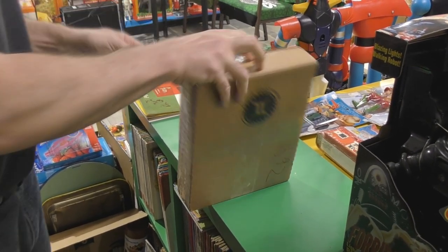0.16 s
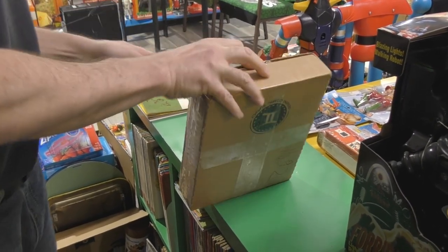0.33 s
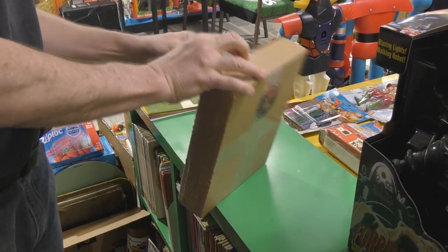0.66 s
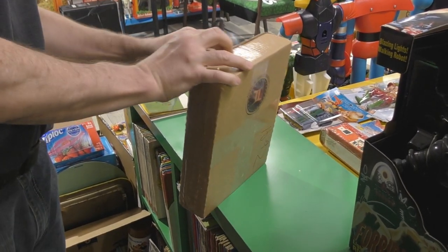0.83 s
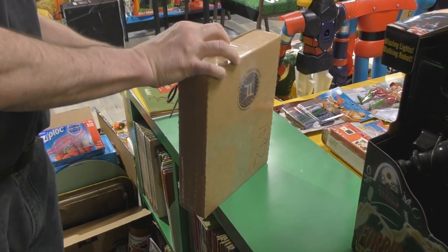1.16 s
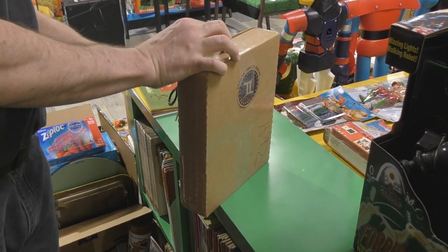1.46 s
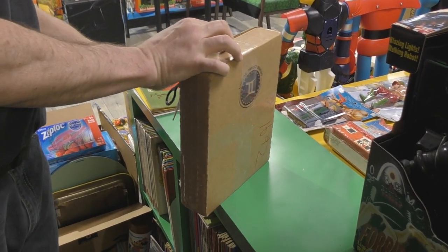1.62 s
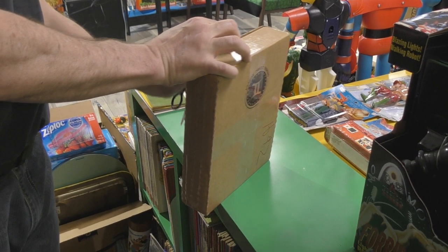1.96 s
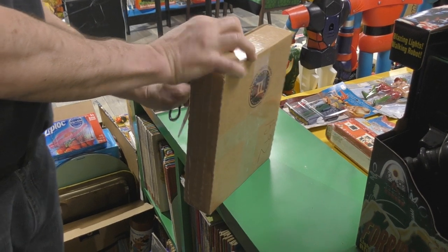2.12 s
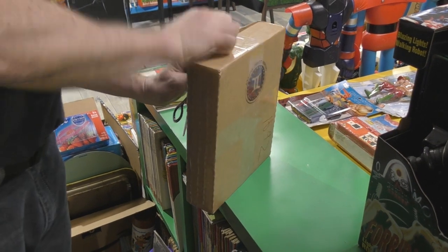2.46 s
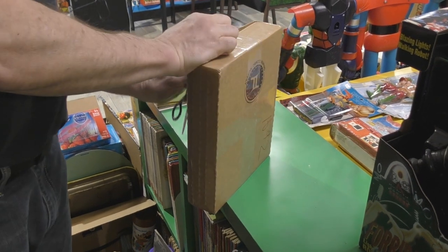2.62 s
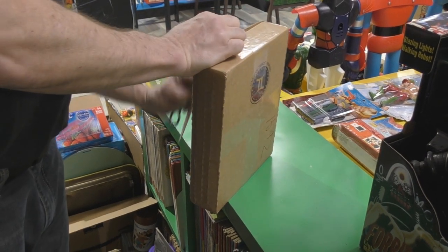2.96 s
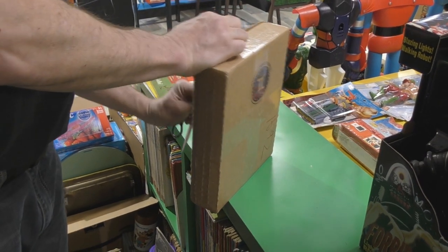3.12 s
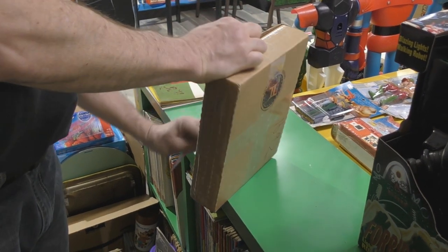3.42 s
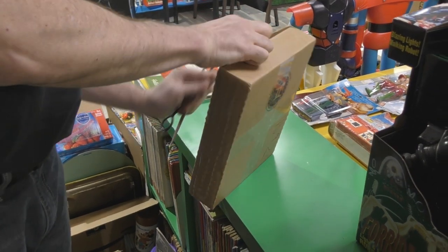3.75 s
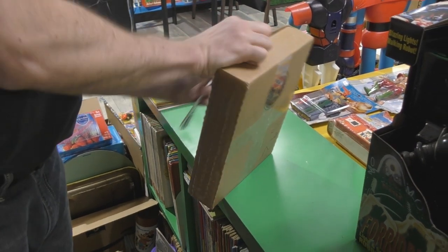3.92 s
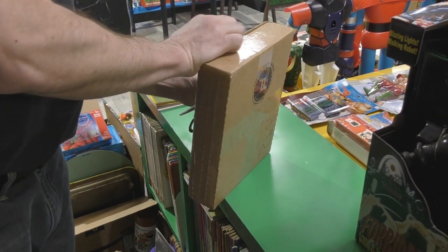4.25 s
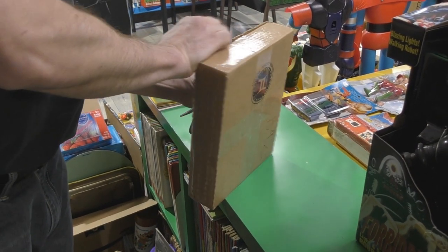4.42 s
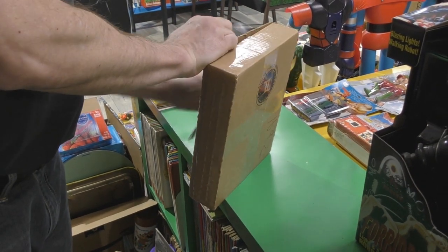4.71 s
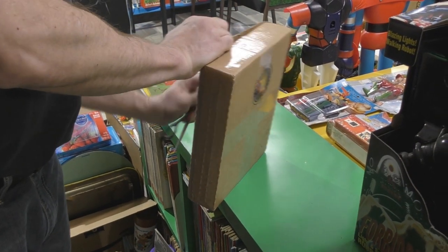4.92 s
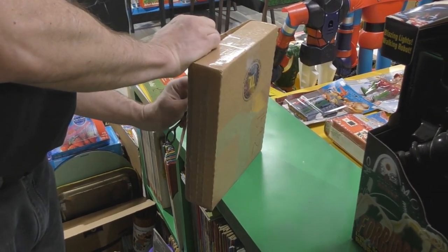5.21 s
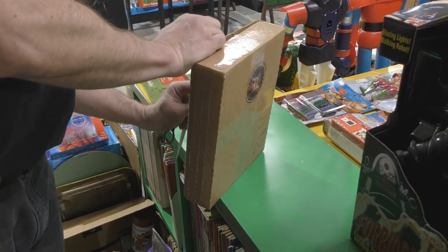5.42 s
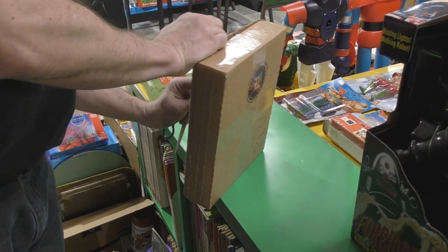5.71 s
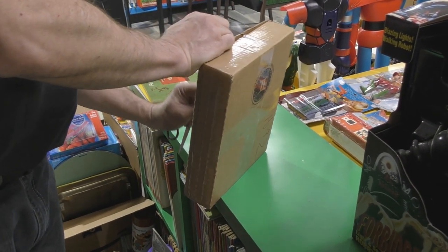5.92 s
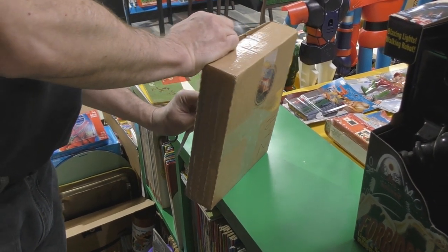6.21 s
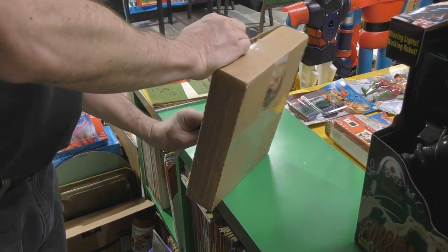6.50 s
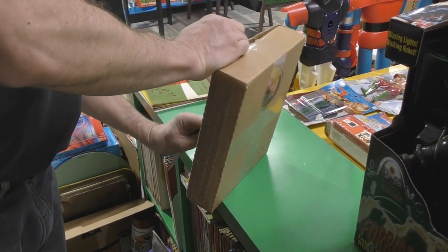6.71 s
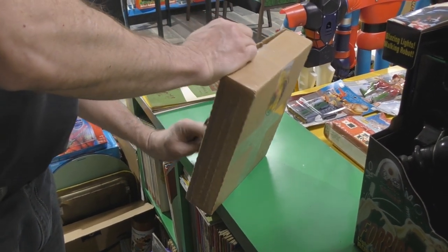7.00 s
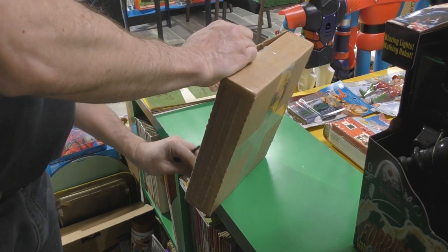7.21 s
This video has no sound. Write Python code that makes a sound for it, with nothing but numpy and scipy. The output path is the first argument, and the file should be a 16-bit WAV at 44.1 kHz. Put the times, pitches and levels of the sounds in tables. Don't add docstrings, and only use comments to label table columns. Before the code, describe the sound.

In a quiet furnished room, fingers slide, pick and tap on a taped hollow carton near a camera microphone. Quiet rubbing leads to crisp clicks, then drumlike cardboard knocks, a short nail zip over corrugations and a faint tool clink. Strong snaps and scrapes come soon after, then scattered taps, a firm knock, and a last scuffing burst with a low table bump. Soft air noise and a barely audible whine continue underneath.

```python
import sys
import numpy as np
from scipy import signal
from scipy.fft import rfft, irfft, next_fast_len
from scipy.io import wavfile
from scipy.ndimage import uniform_filter1d, map_coordinates

SR = 44100
rng = np.random.default_rng(int(sys.argv[2]) if len(sys.argv) > 2 else 0)


def invert_db(level):
    return 10 ** (np.asarray(level, dtype=float) / 20)


def unload_wav(signal):
    wavfile.write(
        sys.argv[1],
        SR,
        np.round(np.clip(np.atleast_2d(signal).T, -1, 1) * 32767).astype(np.int16),
    )


N = 324796


def unit(x):
    return x / np.sqrt(np.mean(x ** 2) + 1e-20)


def along(points, hz):
    point_hz, value = np.transpose(points)
    return np.interp(np.log(hz + 1), np.log(point_hz + 1), value)


def curves(rows):
    s, *columns = np.transpose(rows)
    return [np.interp(np.arange(N) / SR, s, column) for column in columns]


def wobble(rate):
    knots = rng.standard_normal(int(N * rate / SR) + 4)
    return map_coordinates(knots, [np.arange(N) * rate / SR])


def filtered(x, response):
    m = next_fast_len(N + SR // 2)
    return irfft(rfft(x, m) * response(np.fft.rfftfreq(m, 1 / SR)), m)[..., :N]


def body(modes):
    def response(f):
        total = 0
        for k, (hz, width, db) in enumerate(modes):
            total = total + (-1) ** k * invert_db(db) * 1j * f * width / (hz * hz - f * f + 1j * f * width)
        return total
    return response


# frequency in Hz, density in dB per Hz.
AIR_SPECTRUM = [(20, -4), (50, 0.5), (85, -3.5), (140, 2.5), (333, -4), (449, -6), (542, -18.5),
                (800, -40.5)]
# frequency in Hz, density in dB per Hz.
HISS_SPECTRUM = [(450, -41.5), (600, -19.5), (929, -8), (1980, -7), (2730, -11.5), (6490, -26),
                 (12700, -17), (15800, -18.5)]
# frequency in Hz, left-right likeness from 0 to 1.
LIKENESS = [(60, 0.57), (180, 0.032), (550, 0.284), (1650, 0.074), (4970, 0.067), (15000, 0.556)]
FLOOR_DB = -59.5
WHINE_HZ, WHINE_DB = 2008, -74


def floor():
    def spectrum(f):
        level = np.hypot(invert_db(along(AIR_SPECTRUM, f)), invert_db(along(HISS_SPECTRUM, f)))
        turn = np.arccos(np.clip(along(LIKENESS, f), -1, 1)) / 2
        return level * [np.cos(turn), np.sin(turn)]

    pair = rng.standard_normal((2, N)) * invert_db(0.69 * wobble(4.8))
    mid, side = filtered(pair, spectrum)
    whine = invert_db(WHINE_DB + 0.96 * wobble(5.46)) * np.sin(2 * np.pi * WHINE_HZ * np.arange(N) / SR)
    return invert_db(FLOOR_DB) * unit(np.array([mid + side, mid - side])) + whine


CONTROL_S = np.arange(0, N / SR, 1 / 2000)


def gesture(start, length, rise, fall):
    before = (start - CONTROL_S) / abs(rise)
    after = (CONTROL_S - start - length) / abs(fall)
    return invert_db(-20 * np.maximum(0, np.maximum(before, after))) ** 2


# fastest moment in seconds, scrape in dB,
# hiss in dB over the scrape, seconds to rise 20 dB, seconds to fall 20 dB (signs ignored).
SLIDES = [(0.29, -56, 3, 0.1226, 0.21), (0.366, -59, 6.5, 0.1133, 0.02), (0.6, -61, 2, 0.06, 0.47),
          (0.72, -60.5, 2.5, 0.34, 0.09), (0.79, -64.5, -17, 1.37, 0.68),
          (1.384, -58.5, -0.5, 0.2444, 0.1737), (1.764, -64.5, -8.5, 0.43, 0.52),
          (2.47, -53, -2.05, 0.3037, 0.1758), (3.04, -55, -15.5, 0.35, 1.22),
          (3.094, -51, -3.5, 0.2282, 0.09), (3.35, -51.5, -3.5, 0.1562, 0.0843),
          (3.438, -46, -9, -0.0282, 0.0137), (3.658, -54.5, -7.5, -0.03, 0.1545),
          (3.925, -58.5, 1.5, 0.13, -0.3715), (4.138, -59, -22, 0.9, 0.44),
          (4.262, -40.5, 1.5, 0.0236, -0.0106), (4.22, -62.5, 5, 0.1046, -0.35),
          (4.529, -57, 3, -0.02, 0.2024), (5.994, -55.5, -12.5, 0.2535, 0.26),
          (6.83, -57, -11, 0.1263, 0.004), (7.16, -51, -9.5, 0.15, 0.17), (7.2, -46.5, -4.5, 0.057, 0.0972),
          (7.246, -44, -26, 0.033, 0.0439)]
# start in seconds, scrape in dB,
# hiss in dB over the scrape, seconds to fall 20 dB.
JERKS = [(0.136, -60, -4.5, 0.37), (0.764, -52, -14, 0.13), (0.919, -58, 1.24, 0.05),
         (1.114, -67, 8.5, 0.1655), (1.306, -59, -4, 0.2643), (1.954, -65, 6.5, 0.28),
         (2.564, -45, -8, 0.06), (4.236, -40, 0.5, 0.0676), (4.738, -58.5, -1, 0.35),
         (5.094, -56.5, -17, 0.16), (5.482, -55.5, 1, 0.02), (5.727, -51.5, -14, 0.05),
         (6.008, -40, -6, 0.0733), (6.186, -45, -5, 0.09)]
JERK_RISE_S = 0.0074
# start in seconds, length in seconds, scrape in dB,
# hiss in dB over the scrape.
DRAGS = [(0.198, 0.106, -58.5, -16), (0.939, 0.2754, -63, -5.5), (2.069, 0.217, -56.5, -5),
         (2.37, 0.0804, -55.5, 0.86), (2.649, 0.286, -65.5, -6.5), (3.364, 0.0774, -38.5, -3),
         (4.904, 0.035, -68, -8.5), (4.238, 0.0447, -45, 2.5), (3.97, 0.176, -60.5, -13),
         (4.437, 0.066, -50.5, -17.5), (4.602, 0.13, -65, -9), (5.144, 0.657, -70.5, -2),
         (5.932, 0.066, -62.5, -23), (6.089, 0.09, -59.5, -7.5), (6.407, 0.1306, -52.5, -10),
         (6.603, 0.279, -63, -11), (6.878, 0.24, -76.5, -11.5), (7.298, 0.0583, -67.5, -6.5)]
DRAG_RISE_S, DRAG_FALL_S = 0.0181, 0.1116
# firmest moment in seconds, rumble in dB,
# seconds to rise 20 dB, seconds to fall 20 dB (signs ignored).
GRIPS = [(0.2, -67, 3.17, 0.51), (0.64, -65, -0.04, 0.4414), (0.79, -59.5, 0.0946, 0.13),
         (0.918, -64.5, 0.15, 0.48), (1.764, -71, 1.6, 1), (2.09, -62, 0.07, 1.5),
         (2.45, -64.5, 0.55, 0.98), (3.04, -47.5, 0.2276, 0.077), (3.27, -58, -0.56, 0.53),
         (3.369, -46.5, -0.16, 0.17), (3.44, -52.5, -0.37, 0.14), (4.15, -57.5, 0.44, .5),
         (4.263, -50, 0.2, -0.12), (4.506, -60, -1.13, 0.15), (4.738, -66.5, -1.2, 0.48),
         (5.1, -59.5, -0.16, 0.32), (5.482, -59, -0.02, 0.05), (5.735, -60, 0.2, -0.05),
         (5.95, -61.5, -0.27, .5), (6.198, -48.5, 0.0555, 0.0933), (6.42, -51, -0.0968, 0.2448),
         (6.55, -64, -0.08, -0.32), (6.82, -64, -1.75, 0.17), (7.206, -47, 0.0631, 0.1139),
         (7.3, -60, 0.21, -1)]


def hands():
    moves = [(gesture(s, 0, rise, fall), db, hiss_db) for s, db, hiss_db, rise, fall in SLIDES]
    moves += [(gesture(s, 0, JERK_RISE_S, fall), db, hiss_db) for s, db, hiss_db, fall in JERKS]
    moves += [(gesture(s, length, DRAG_RISE_S, DRAG_FALL_S), db, hiss_db)
              for s, length, db, hiss_db in DRAGS]
    hiss = sum(invert_db(db + hiss_db) ** 2 * power for power, db, hiss_db in moves)
    scrape = sum(invert_db(db) ** 2 * power for power, db, hiss_db in moves)
    grip = sum(invert_db(db) ** 2 * gesture(s, 0, rise, fall) for s, db, rise, fall in GRIPS)
    return [np.interp(np.arange(N) / SR, CONTROL_S, np.sqrt(power)) for power in (hiss, scrape, grip)]


def gritty(grain_db, clump_db, patchy_db):
    z = signal.stft(rng.standard_normal(N), nperseg=512)[2]
    patches = uniform_filter1d(uniform_filter1d(rng.standard_normal(z.shape), 5, 0), 8, 1)
    noise = signal.istft(z * invert_db(patchy_db * unit(patches)), nperseg=512)[1][:N]
    return noise * invert_db(grain_db * wobble(700) + clump_db * wobble(45))


# frequency in Hz, density in dB per Hz.
SKIN_SPECTRUM = [(1470, -26.5), (2500, -9), (3730, -0.5), (4600, -3), (5280, -5.5), (6300, -3),
                 (7830, -2.5), (11700, -3.5), (15800, -9)]
# frequency in Hz, width in Hz, level in dB.
CARD_MODES = [(574, 300, -14.5), (1082, 324.3, -0.5), (1500, 691, -1), (2234, 636, -1.5),
              (3206, 1030, -9.5)]
# frequency in Hz, width in Hz, level in dB.
PANEL_MODES = [(181, 30.9, -1), (350, 97.08, -13.5), (472.7, 70.6, -18)]


def rubbing():
    skin, nail, grip = hands()
    hiss = gritty(grain_db=2.5, clump_db=0.7, patchy_db=1.5)
    hiss = unit(filtered(hiss, lambda f: invert_db(along(SKIN_SPECTRUM, f))))
    scrape = gritty(grain_db=2.5, clump_db=1, patchy_db=1.6)
    scrape = unit(filtered(scrape, body(CARD_MODES)))
    rumble = gritty(grain_db=1.51, clump_db=3.0, patchy_db=1.0)
    rumble = unit(filtered(rumble, lambda f: body(PANEL_MODES)(f) * f / (f + 90)))
    return invert_db(-1.5) * skin * hiss + invert_db(-1.42) * nail * scrape + invert_db(2.5) * grip * rumble


# start in seconds, peak in dB, card in dB over the peak,
# tape edge in dB over the peak.
SNAPS = [(0.9183, -49.5, -5.5, 12.5), (0.9567, -43.5, -2.5, -12), (1.1154, -42.5, -7, 2),
         (1.3055, -49.5, -1, -15), (1.9545, -35, -19, -5.5), (1.961, -36.5, -10, -5),
         (1.989, -37.5, -6.5, -21), (2.6677, -51.5, -9.5, -15.5), (3.3117, -44, -7.5, -14.5),
         (3.327, -50, -3.5, -8), (0.1343, -51, -13.5, -25), (3.3659, -26, -16, -18.5),
         (3.4555, -30, -4, -19), (3.948, -27, -12.5, -9), (3.954, -46, -19, -13.5),
         (4.2373, -33.5, -13.5, -12.5), (4.2547, -25, -10.5, -22.5), (4.262, -26, -11.5, -4),
         (4.293, -47, -9.5, -25.5), (4.4331, -34, -11, -27.5), (4.457, -38, -23.5, -18),
         (4.532, -36, -15, -11), (4.7396, -44, -4.5, 7), (6.0119, -32.5, -7, -15),
         (6.1352, -48, -10.5, -11), (7.196, -37, -16.5, 2.5), (7.2445, -36.5, -3, -26.5)]
SNAP_HZ, SNAP_SPREAD, SNAP_T60 = 2250, 0.133, 0.0504
# start in seconds, card peak in dB, card note in Hz.
TAPS = [(0.1343, -46, 1712), (0.517, -45.5, 1203), (0.7685, -40.5, 1583), (0.7844, -53.5, 1083),
        (1.0307, -43.5, 1239), (2.2194, -46, 1184), (2.364, -48, 1516), (2.5638, -33.5, 1235),
        (2.5761, -37, 1460), (3.0326, -43, 1120), (3.6304, -45.5, 1263), (2.081, -60, 1800),
        (3.175, -56.5, 1500), (5.68, -53, 993.6), (6.635, -60, 1197), (6.814, -52.5, 1500),
        (6.831, -49.5, 2130), (7.133, -51.5, 1900), (7.157, -45.5, 2288), (7.2078, -35, 1406),
        (3.6924, -52.5, 1224), (4.479, -39, 983), (5.0971, -52.5, 1100), (5.479, -45, 1515),
        (5.7299, -42.5, 1648), (5.9276, -47, 1636), (6.1872, -30.5, 1500), (6.412, -51.5, 1380),
        (6.475, -56, 2220), (1.215, -55, 1284), (1.78, -59.5, 1500), (6.7, -50, 1500),
        (6.7562, -46.5, 1538), (7.185, -41.5, 1369), (7.244, -31, 1500)]
TAP_TAPE_DB, TAP_EDGE_DB, TAP_T60 = -10, -19.5, 0.0341
TAPE_LOW_HZ = 1800


def picks():
    force, notes = np.zeros((3, N + SR)), np.zeros(N + SR)
    t = np.arange(SR // 8) / SR
    spots = SNAP_HZ * np.exp(SNAP_SPREAD * rng.uniform(-0.98, 1, len(SNAPS)))
    clicks = [(*row, hz, SNAP_T60) for row, hz in zip(SNAPS, spots)]
    clicks += [(s, db + TAP_TAPE_DB, -TAP_TAPE_DB, TAP_EDGE_DB, hz, TAP_T60) for s, db, hz in TAPS]
    for s, db, card_db, edge_db, card_hz, t60 in clicks:
        start = round(s * SR)
        grit = rng.standard_normal((3, len(t)))
        burst = grit * (invert_db(-60 * t / 0.0036) + 0.409 * invert_db(-60 * t / t60))
        burst[:, :1] = 2.65
        levels = db + np.array([[card_db + 8.5], [1.5], [edge_db - 3.5]])
        force[:, start:][:, :len(t)] += invert_db(levels) * burst
        note = invert_db(db + card_db + 1.0 - 60 * t / 0.0199) * np.sin(2 * np.pi * card_hz * t)
        notes[start:][:len(t)] += note

    def tape_response(f):
        return body([(3660, 2800, 0)])(f) * (1j * f / (TAPE_LOW_HZ + 1j * f)) ** 2 * invert_db(2.0)

    card = filtered(force[0], body(CARD_MODES))
    tape = filtered(force[1], tape_response)
    edge = filtered(force[2], lambda f: body([(10500, 8000, 0)])(f) ** 2)
    return card + tape + edge + notes[:N]


# start in seconds, peak in dB, panel note in Hz,
# flap in dB over the peak, flap note in Hz.
KNOCKS = [(0.223, -60, 187.1, 1.5, 462.7), (0.495, -68.5, 207.9, 16.5, 388.1),
          (0.509, -61.5, 213, 18, 393.3), (0.79, -64, 220, 6.5, 369.8), (0.812, -68.5, 220, 5, 364),
          (0.769, -56.5, 226.1, 4.5, 370.1), (1.213, -57.5, 187.6, -9, 367.3),
          (2.764, -51.5, 204.4, -10, 458.3), (3.032, -31.5, 181.3, -12.5, 443),
          (3.356, -35, 195.6, -11, 493.6), (3.449, -38.5, 198.9, -8.5, 350),
          (3.692, -47.5, 223.3, 6.5, 356), (3.704, -46, 209.6, -7, 350), (4.104, -41, 176.5, -12.5, 308.3),
          (4.246, -39.5, 192, -9.5, 339.3), (4.468, -39.5, 203.4, -11.5, 340), (4.737, -66, 186, 7.5, 379),
          (5.095, -35.5, 194.1, -15, 336.4), (5.663, -52, 204, -10.5, 359),
          (5.966, -49.5, 199, -11.5, 314.7), (6.011, -33, 211.3, -16, 493.8),
          (6.187, -25.5, 205.9, -22, 476.5), (6.476, -46, 186.7, -15.5, 316),
          (7.209, -34.5, 179.5, -11.5, 397), (7.246, -32, 171.7, -13.5, 347)]
# start in seconds, peak in dB, panel note in Hz.
PUSHES = [(0.957, -54.5, 185.9), (2.114, -46.5, 204.5), (2.155, -51, 201.2), (2.494, -44.5, 165.4),
          (2.572, -41, 181), (2.937, -36, 206.7), (2.966, -48.5, 201), (3.012, -45.5, 190.6),
          (3.084, -37, 188.7), (3.13, -44, 195), (3.284, -39.5, 195.4), (3.329, -34.5, 190.7),
          (3.393, -39.5, 197.5), (3.423, -35, 197), (3.494, -41.5, 189.8), (3.73, -40.5, 201),
          (4.268, -43.5, 195.4), (4.487, -41.5, 194.3), (5.4565, -52.5, 200.4), (5.481, -44.5, 208.7),
          (5.7562, -49, 198.7), (5.931, -57, 203), (5.984, -49.5, 195.3), (6.001, -41.5, 200.7),
          (6.217, -42, 195.8), (6.5502, -49, 193), (6.7, -57.5, 191), (6.771, -56.5, 185.3),
          (7.2257, -39.5, 183.2), (7.2357, -44.5, 186.6), (4.2566, -41.5, 192.6), (5.731, -38.5, 197.7),
          (6.402, -41.5, 199.8), (6.413, -37, 192.7), (6.443, -44, 206), (6.529, -44, 192.6),
          (7.169, -45.5, 178), (7.187, -38, 179)]
PUSH_FLAP_DB, PUSH_FLAP_HZ = -19.5, 340
SOFT_S = 0.0056
# frequency in Hz, width in Hz, level in dB.
WALL_MODES = [(310, 159, 5), (533.4, 177, -3), (913, 290, -2)]
WALL_DB, WALL_SHARE = 24.5, 0.77
# start in seconds, level in dB.
TABLE_BUMPS = [
    (3.699, -46),
    (7.249, -50.5),
]
TABLE_HZ, TABLE_T60 = 65, 0.15


def thumps():
    out, walls, t = np.zeros(N + SR), np.zeros(N + SR), np.arange(SR // 3) / SR
    blows = KNOCKS + [(*row, PUSH_FLAP_DB, PUSH_FLAP_HZ) for row in PUSHES]
    swell = (1 - np.exp(-t / SOFT_S)) ** 2
    for s, db, panel_hz, flap_db, flap_hz in blows:
        start = round((s - 0.348 * SOFT_S) * SR)
        panel = invert_db(-60 * t / (0.04704 + 5 * SOFT_S)) * np.sin(2 * np.pi * panel_hz * t)
        panel += invert_db(-11 - 60 * t / 0.0745) * np.sin(2 * np.pi * 1.1763 * panel_hz * t)
        panel += invert_db(-13.0 - 60 * t / 0.06) * np.sin(2 * np.pi * 115 * t)
        flap = invert_db(flap_db - 60 * t / (0.0452 + 6 * SOFT_S)) * np.sin(2 * np.pi * flap_hz * t)
        out[start:][:len(t)] += invert_db(db + 13.5) * (panel + flap) * swell
        wall_gain = invert_db(db + WALL_SHARE * flap_db + WALL_DB - 60 * t / 0.06)
        walls[start:][:len(t)] += wall_gain * rng.standard_normal(len(t)) * swell
    out = filtered(out[:N], lambda f: (1j * f / (70 + 1j * f)) ** 2)
    bump = invert_db(-60 * t / TABLE_T60) * np.sin(2 * np.pi * TABLE_HZ * t) * (1 - np.exp(-t / 0.004305))
    for s, db in TABLE_BUMPS:
        start = round(s * SR)
        out[start:][:len(t)] += invert_db(db) * bump[:N - start]
    return out + filtered(walls[:N], body(WALL_MODES))


# start in seconds, level in dB, note in Hz, #
# t60 in seconds.
RINGS = [(0.515, -52.5, 1248.6, 0.107), (0.8633, -51.5, 1102, 0.07), (2.577, -43.5, 1400, 0.053),
         (4.235, -35, 2160, 0.092), (4.256, -34, 1100, 0.059), (4.3, -48.5, 1300, .04),
         (.27, -56.5, 4500, 0.21), (3.454, -40, 1300, 0.055), (2.9, -44.5, 1130, 0.0531),
         (4.74, -56, 7100, 0.18), (4.742, -57.5, 6800, 0.135), (3.358, -37, 1120, 0.105),
         (3.372, -38, 2420, 0.118), (4.7417, -54, 9200, 0.0321), (5.935, -54, 963, 0.33)]
RING_SHAKE_HZ = 3500


def rings():
    out, t = np.zeros(N + SR), np.arange(SR // 4) / SR
    shake = wobble(350)[:N // len(t) * len(t)].reshape(-1, len(t))
    for (s, db, hz, t60), unsteady in zip(RINGS, shake):
        note = np.sin(2 * np.pi * hz * t + hz / RING_SHAKE_HZ * unsteady)
        out[round(s * SR):][:len(t)] += invert_db(db - 60 * t / t60) * note * (1 - np.exp(-t / 0.001))
    return out[:N]


# time in seconds, level in dB, ridges a second.
ZIP_RUN = [
    (3.358, -40.5, 459),
    (3.37, -35, 495),
    (3.386, -32, 550),
    (3.398, -31.5, 602),
    (3.408, -37, 668),
    (3.419, -31.5, 640),
    (3.427, -31, 660),
    (3.435, -31, 700),
    (3.443, -45, 715),
]
# frequency in Hz, width in Hz, level in dB.
RIDGED_MODES = [(557, 208, -3), (704, 140, -8.5), (1100, 150, 2), (1310.6, 237, 0), (2391, 179, 4),
                (2574, 234, 1), (3310, 606, -9), (8050, 2500, -17)]
ZIP_JITTER, ZIP_SCATTER_DB = 0.269, 1.76


def corrugation_zip():
    db, rate = curves(ZIP_RUN)
    t = np.arange(N) / SR
    on = np.clip(np.minimum(t - ZIP_RUN[0][0], ZIP_RUN[-1][0] - t) / 0.002987, 0, 1)
    phase = 2 * np.pi * np.cumsum(rate * on) / SR + ZIP_JITTER * wobble(400)
    ticks = sum(np.cos(k * phase) for k in range(1, 15))
    return filtered(invert_db(db + ZIP_SCATTER_DB * wobble(350)) * on * ticks, body(RIDGED_MODES))


# start in seconds, blade in dB, pivot in dB.
CLINKS = [
    (3.903, -51, -68),
    (3.915, -58, -46),
    (3.9204, -58.5, -44.5),
    (3.9263, -67, -50),
]
# frequency in Hz, level in dB, t60 in seconds.
BLADE_MODES = [(2438, -3.5, 0.385), (7740, -8, 0.054), (6299, -11.5, 0.0477), (3570.4, -1, 0.0381)]
# frequency in Hz, level in dB, t60 in seconds.
PIVOT_MODES = [(10090, 4, 0.0291), (9590, 0, 0.04262), (12950, 3.5, 0.03186), (14500, -8.5, 0.02925),
               (5900, -6.5, 0.06), (8500, -3, 0.0423), (10865, -1.5, 0.041)]
CLINK_STOP_S = 3.947


def clink():
    out, t = np.zeros(N), np.arange(SR // 8) / SR
    shake = iter(wobble(900)[:N // len(t) * len(t)].reshape(-1, len(t)))
    for s, blade_db, pivot_db in CLINKS:
        for level_db, modes, rattle in ((blade_db, BLADE_MODES, 0.3), (pivot_db, PIVOT_MODES, 1.3)):
            for hz, db, t60 in modes:
                ring = np.sin(2 * np.pi * hz * (s + t) + rattle * next(shake))
                out[round(s * SR):][:len(t)] += invert_db(level_db + db - 60 * t / t60) * ring
    return out * np.clip((CLINK_STOP_S - np.arange(N) / SR) / 0.002616, 0, 1)


def clutter(x):
    k = np.arange(SR // 50)
    echoes = rng.standard_normal(len(k)) * invert_db(-60 * k / SR / 0.0136) * (k > 20)
    scattered = signal.fftconvolve(x, echoes / np.linalg.norm(echoes))[:N]
    return filtered(scattered, lambda f: f / (f + 2500))


# frequency in Hz, t60 in seconds.
ROOM_T60 = [(200, 0.165), (2000, 0.2699), (10000, 0.156)]


def room(x):
    hz, t, z = signal.stft(rng.standard_normal((2, SR // 2)), SR, nperseg=256)
    t60 = along(ROOM_T60, hz)[:, None]
    tail = signal.istft(z * invert_db(-60 * t / t60) / np.sqrt(t60), SR, nperseg=256)[1]
    delayed = np.pad(x, ((0, 0), (200, 0)))
    return signal.fftconvolve(delayed, tail / np.linalg.norm(tail[0]), axes=1)[:, :N]


def scene():
    bright = rubbing() + picks() + rings() + corrugation_zip() + clink()
    near = bright * invert_db([[0.4], [-0.4]])
    near = near + invert_db(-9.5) * clutter(bright) * np.array([[1], [-1]])
    low = thumps() * np.ones((2, 1))
    answer = invert_db(-11.5) * room(near + 0.33 * low)
    return near + low + answer + floor()


def top_cut(x):
    return signal.sosfilt(signal.butter(12, 16860, fs=SR, output="sos"), x)


def record(dry):
    top_hz, bass_hz = 15880, 35
    mix = filtered(dry, lambda f: (f < top_hz) * f ** 2 / (f ** 2 + bass_hz ** 2))
    return top_cut(mix)


dry = scene()
out = record(dry)
unload_wav(out)
```